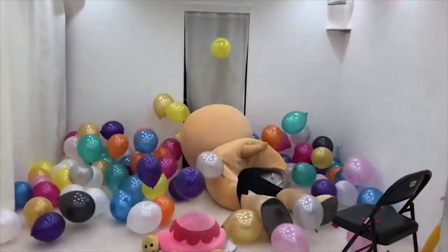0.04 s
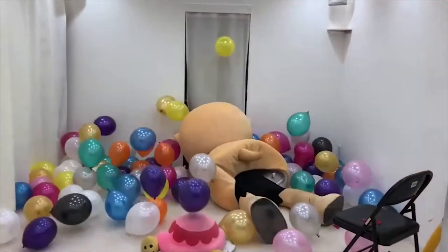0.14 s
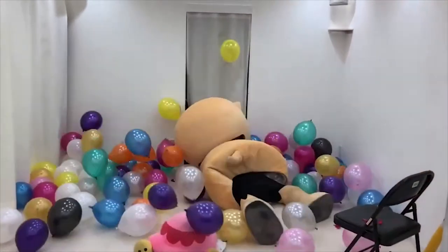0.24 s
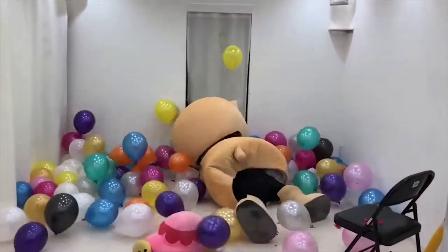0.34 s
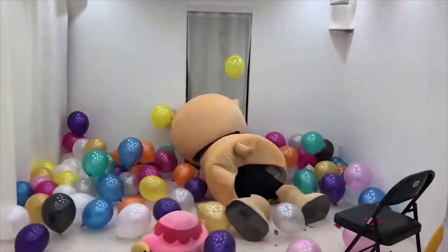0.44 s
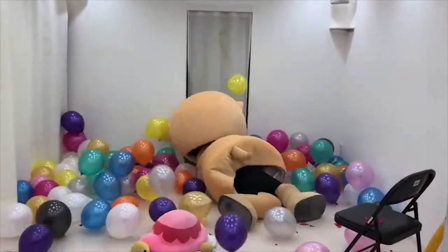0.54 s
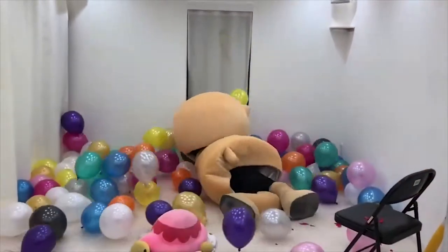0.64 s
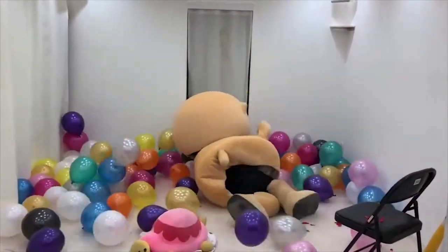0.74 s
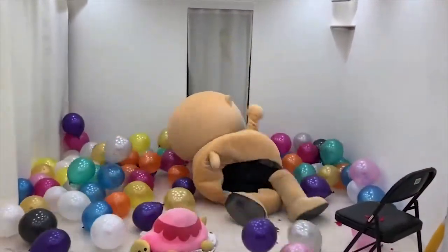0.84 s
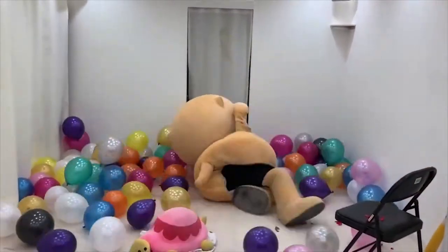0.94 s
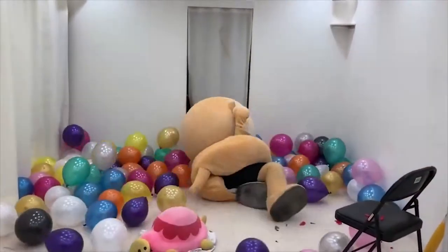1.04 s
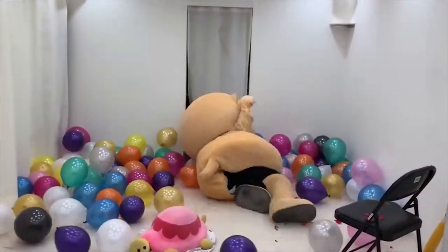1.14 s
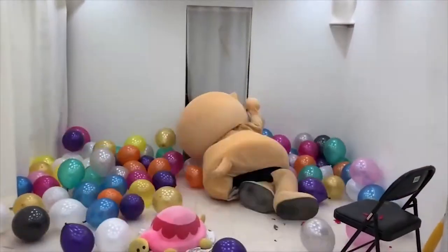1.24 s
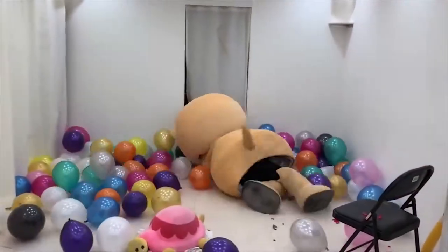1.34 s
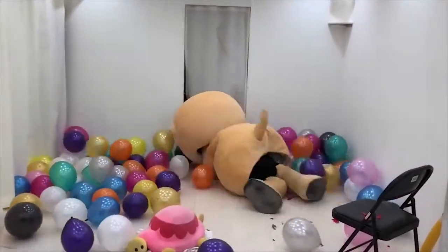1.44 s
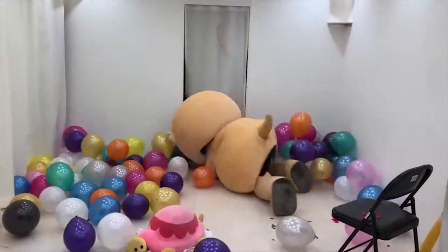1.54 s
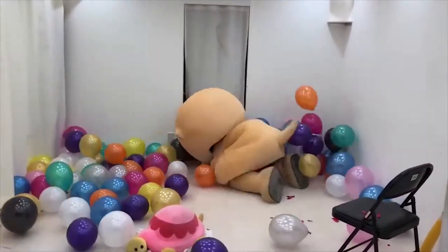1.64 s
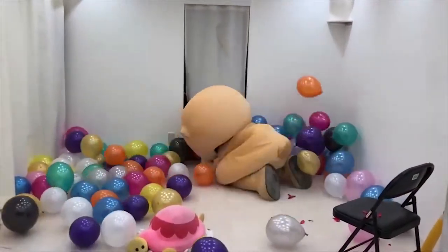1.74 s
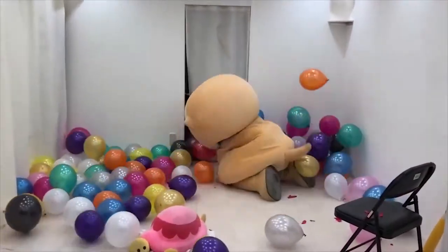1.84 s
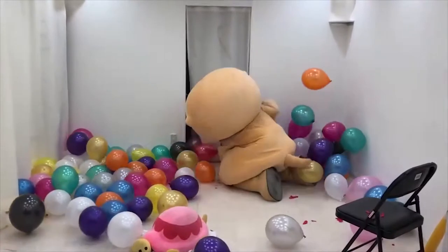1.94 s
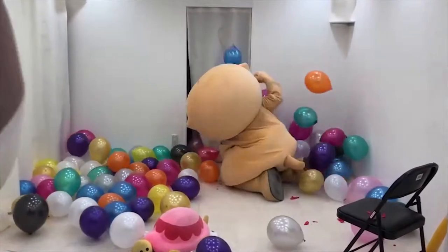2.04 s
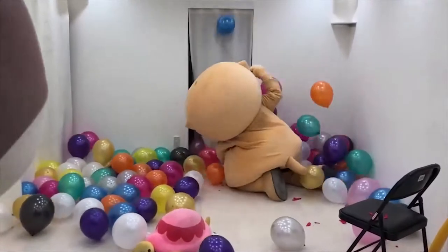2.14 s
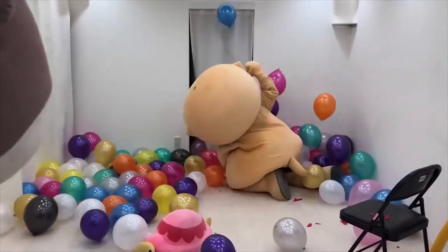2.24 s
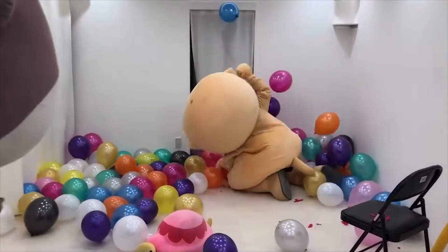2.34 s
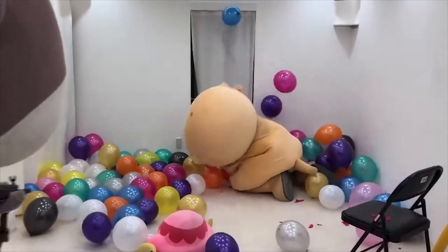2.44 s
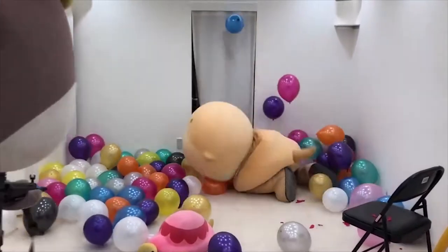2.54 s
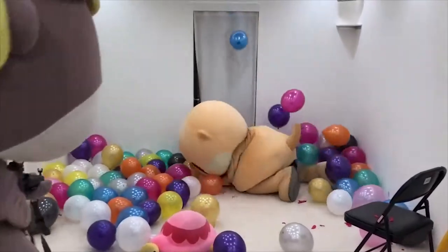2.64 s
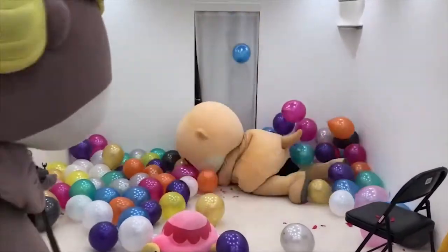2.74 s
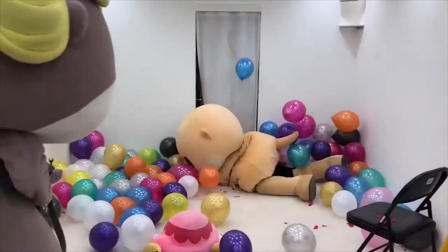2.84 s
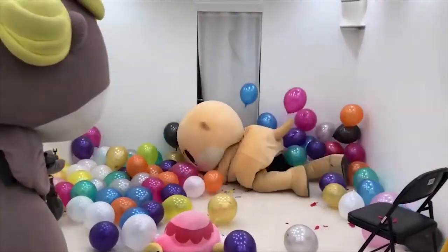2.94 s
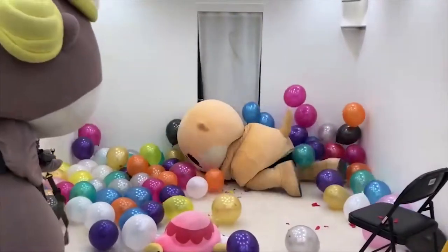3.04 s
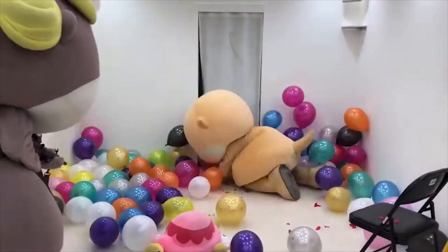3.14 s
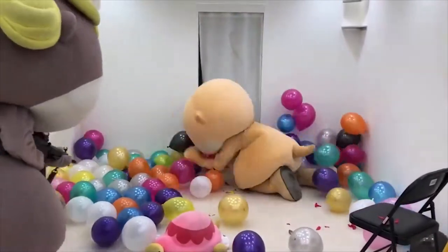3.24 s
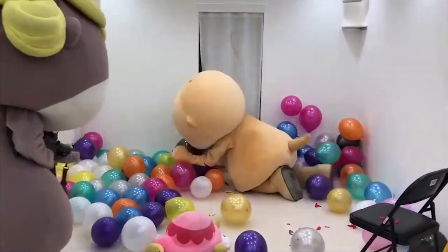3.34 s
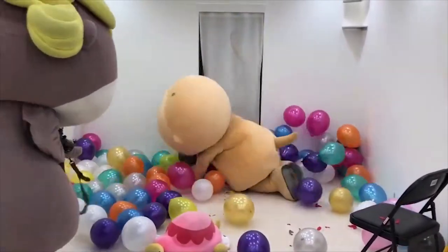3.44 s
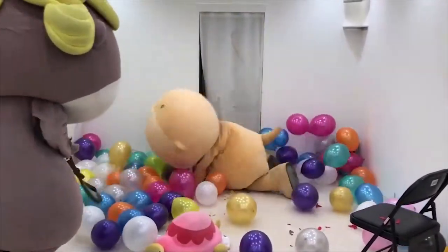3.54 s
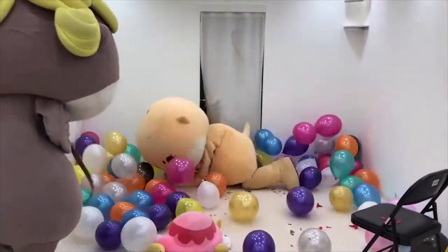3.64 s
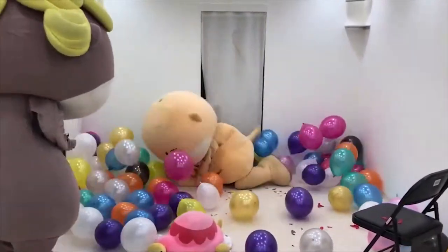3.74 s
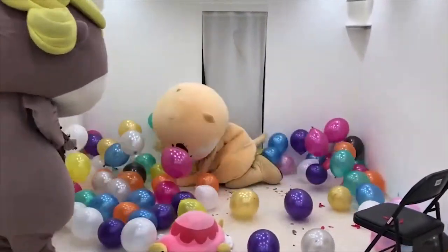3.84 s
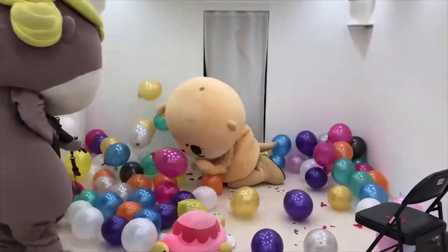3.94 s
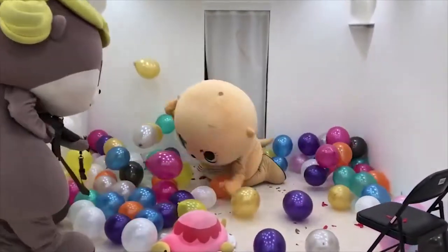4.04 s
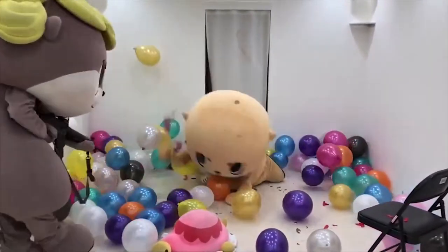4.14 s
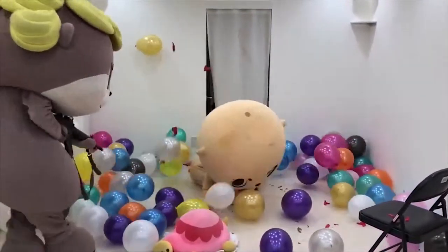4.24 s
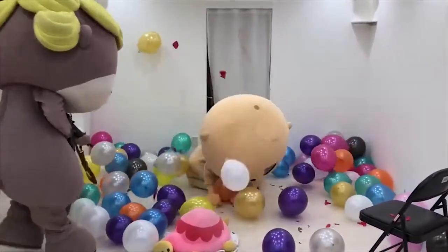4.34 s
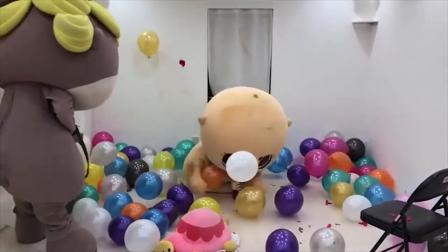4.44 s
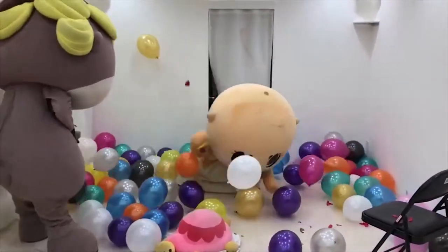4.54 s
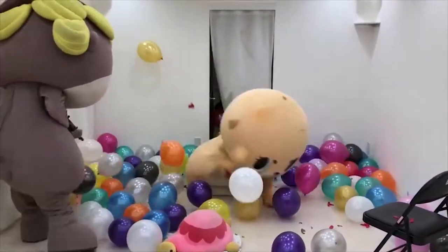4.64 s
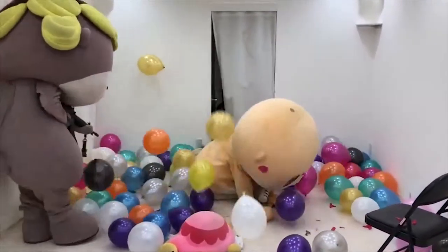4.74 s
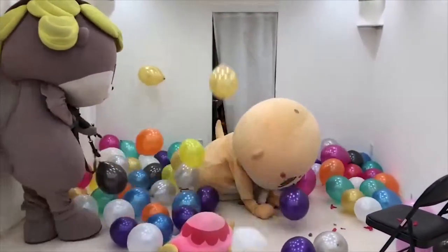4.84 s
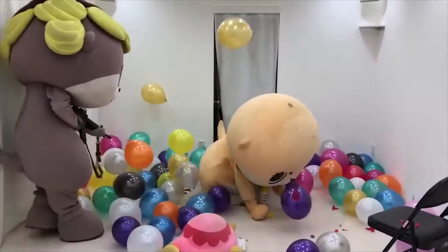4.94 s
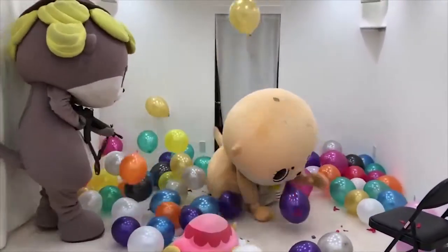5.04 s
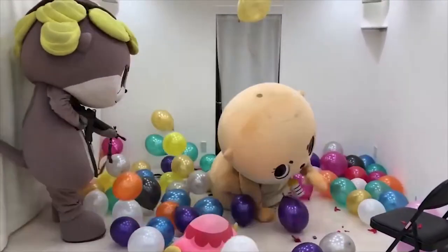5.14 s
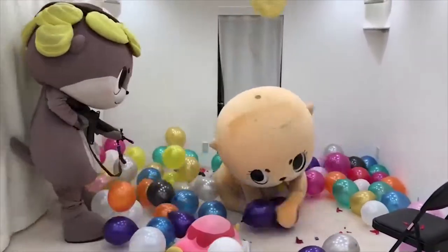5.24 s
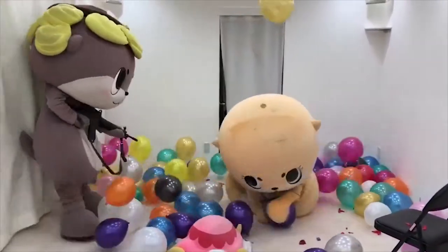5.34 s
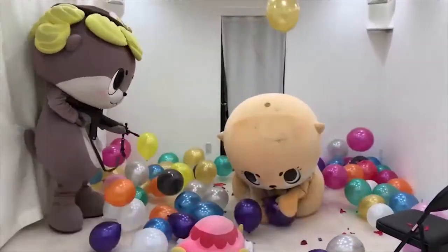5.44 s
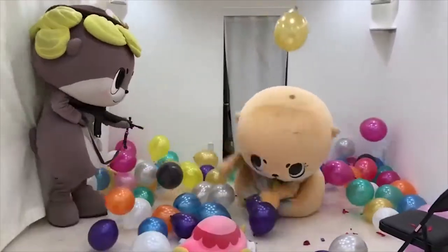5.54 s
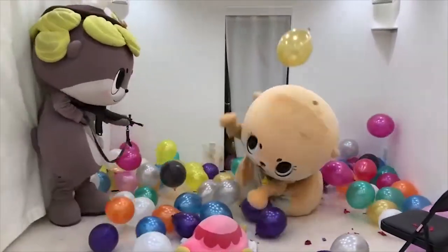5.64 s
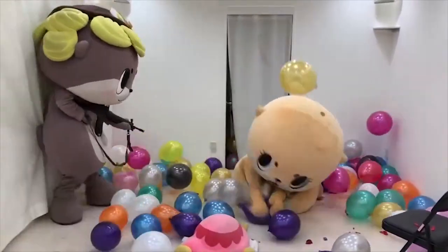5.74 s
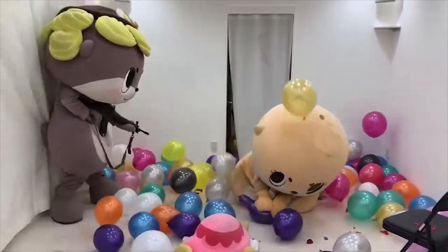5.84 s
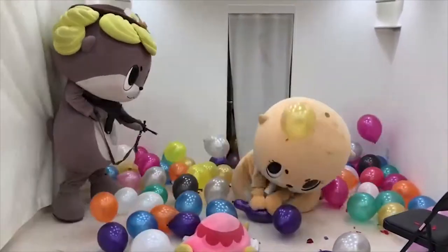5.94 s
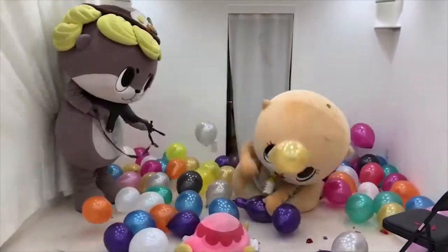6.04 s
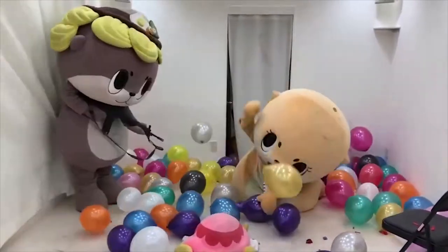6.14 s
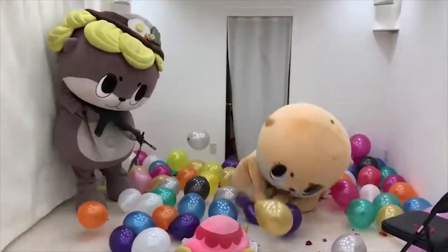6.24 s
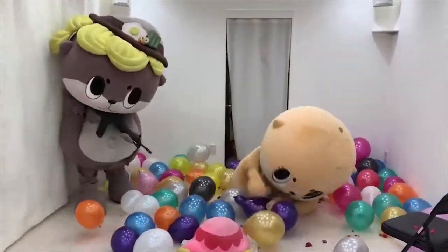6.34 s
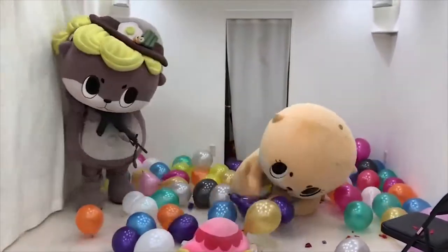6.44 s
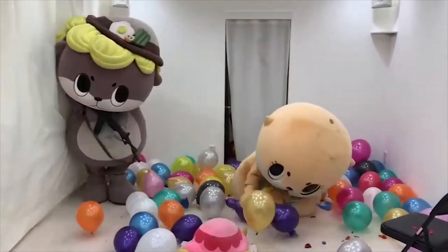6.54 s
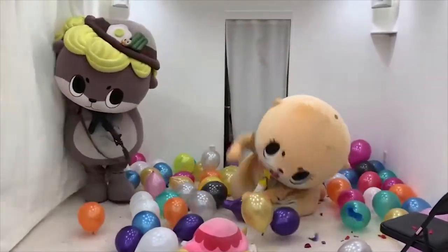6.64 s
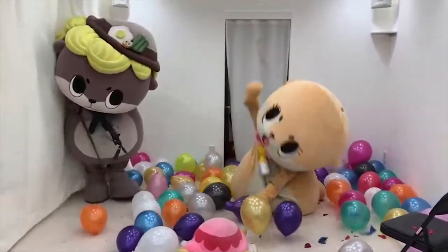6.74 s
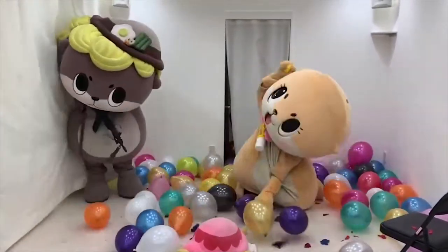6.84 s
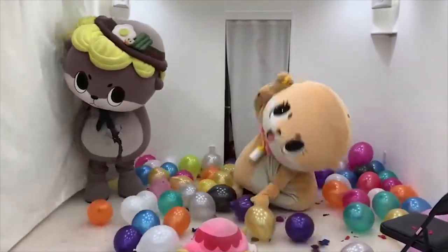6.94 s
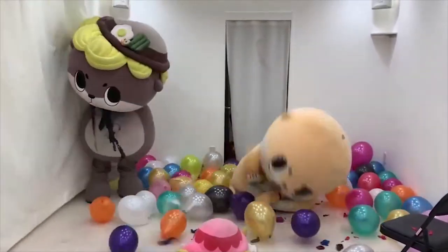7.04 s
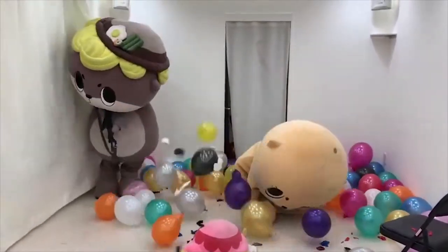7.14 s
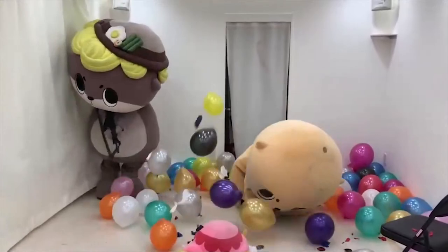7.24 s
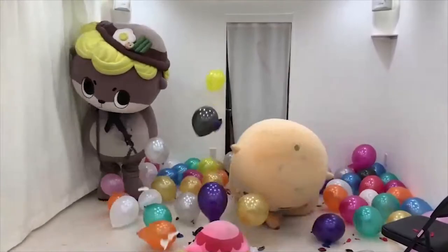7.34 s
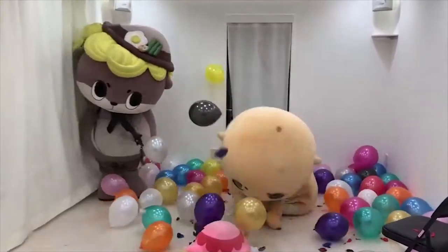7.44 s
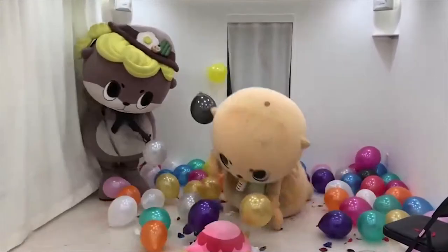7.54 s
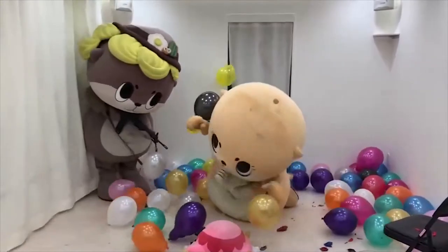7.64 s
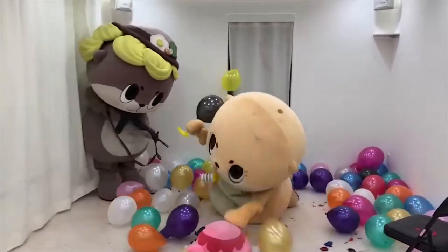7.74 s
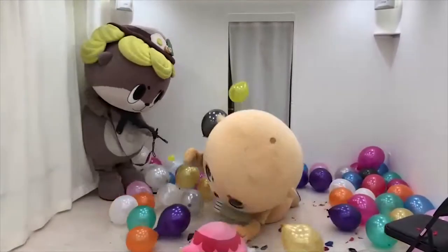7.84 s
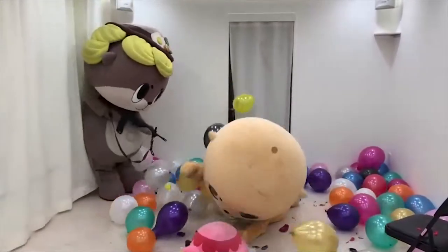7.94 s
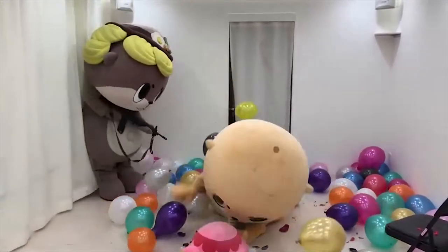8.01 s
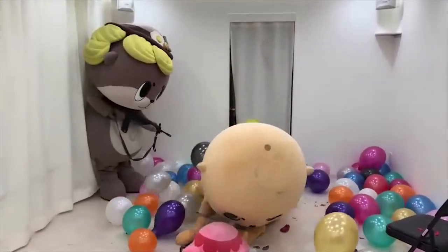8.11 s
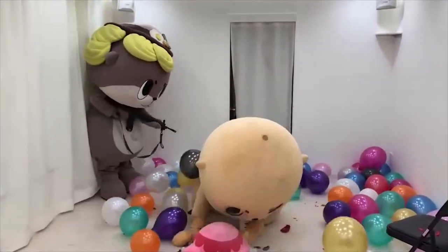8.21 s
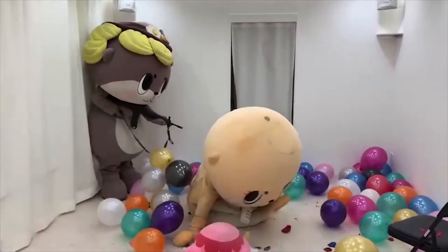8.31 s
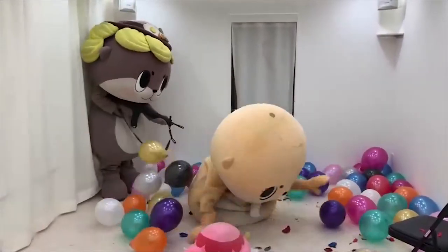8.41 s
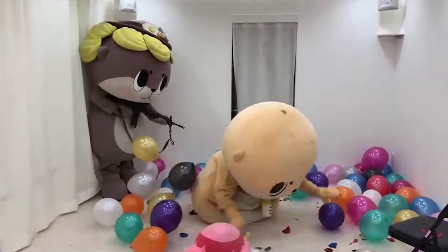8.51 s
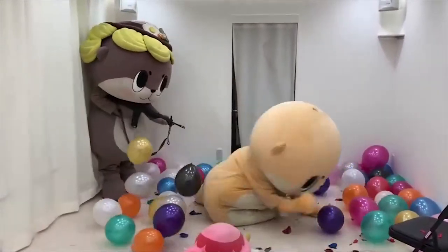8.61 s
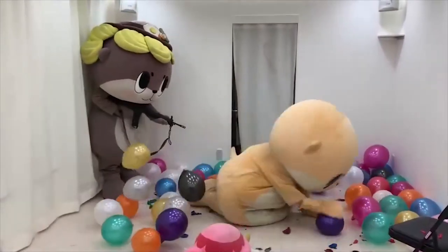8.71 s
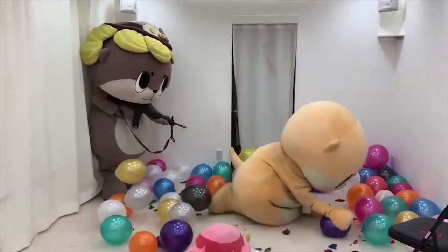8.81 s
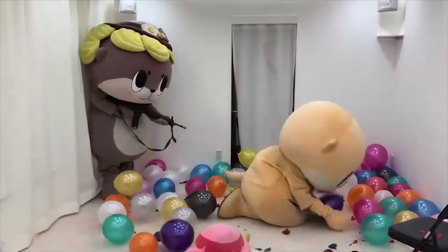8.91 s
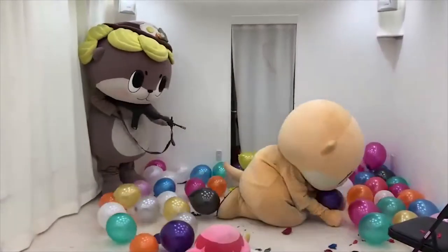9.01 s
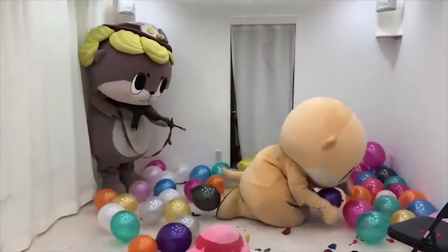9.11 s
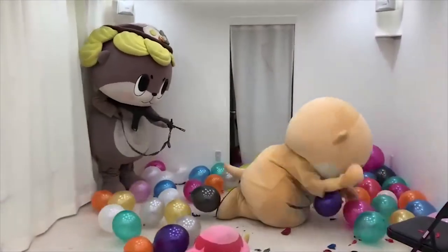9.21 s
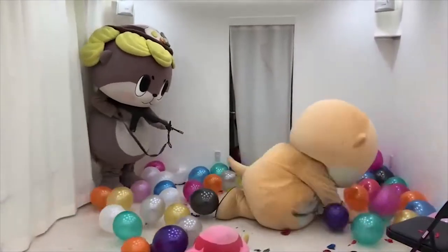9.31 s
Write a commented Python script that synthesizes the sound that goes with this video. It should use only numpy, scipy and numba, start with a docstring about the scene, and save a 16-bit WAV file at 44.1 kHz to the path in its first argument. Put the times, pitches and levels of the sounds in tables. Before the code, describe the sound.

A small bare room, heard through a phone microphone that flattens loud peaks. For the first 1.3 s there is only very faint cloth rustle and balloons bumping hollowly. At 1.4 s a soft low thud comes with a muffled burst; the stirring swells, and tiny rubber squeaks chirp until about 3 s, with a tight triple pop near 2.6 s. At 3.5 s bright ripping snaps lead into a hard cluster of bangs, with a heavy padded thump at 3.65 s. Further bursts come at 4.1-4.2, 4.7-4.9, 5.1-5.4 and 5.7-5.8 s. A rapid volley cracks at 6.3-6.6 s, then spaced bangs at 6.9, 7.1, 7.65 and 8.1 s, the one at 7.1 s big and slow-tearing, with body thuds. A pair bursts at 8.4-8.5 s, then a dense run from 8.8 to 9.1 s. Short boxy echoes and faint steel chair ringing follow; rustling and a soft thud close.

```python
"""Bursting a heap of balloons

Someone in a plush costume rolls about in a heap of party balloons in a small bare room and bursts them
in quick runs. Taut rubber squeaks as a stick-slip sawtooth, snaps as ringing noise and cracks in N-shaped pulses.
Each blast is noise that dies away band by band, and it sets a steel chair faintly ringing.
Cloth rustles as shaped noise and the body thuds in a few low cycles with a short boom.
The phone's limiter flattens every loud bang."""
import sys
import numpy as np
from scipy import signal
from scipy.fft import rfft, irfft, next_fast_len
from scipy.io import wavfile
from scipy.ndimage import uniform_filter1d
from numba import njit

SR = 44100
rng = np.random.default_rng(int(sys.argv[2]) if len(sys.argv) > 2 else 0)


def store_wav(level_fs):
    """Save 16-bit WAV to argv[1]."""
    pcm = np.round(np.clip(np.atleast_2d(level_fs), -1, 1) * 32767)
    wavfile.write(sys.argv[1], SR, pcm.T.astype(np.int16))


N = 413216

# how hard the body stirs the heap, driving both jostling and cloth: (time [s], effort level [dB])
MOVEMENT = [(0, -63.5), (.7, -59), (1.33, -49), (1.55, -37), (1.88, -43.5), (2.5, -44), (2.85, -46),
            (3.1, -53), (3.9, -50), (5.4, -50), (6.2, -49), (6.8, -51), (7.45, -57), (7.9, -53),
            (9.35, -51)]
# single strokes of plush over the rubber: (time [s], length [s], level [dB])
BRUSHES = [(0.341, 0.26, -58), (0.827, 0.08, -66), (0.963, 0.15, -60), (1.48, 0.15, -46.5),
           (2.758, 0.17, -51), (3.328, 0.11, -60), (4.298, 0.11, -48.5), (5.64, 0.089, -52.5),
           (5.937, .14, -56.5), (7.483, 0.14, -55), (7.854, 0.057, -56), (8.351, 0.11, -51)]
# tone of balloons bumping together: (frequency [Hz], relative level [dB])
JOSTLE_SPECTRUM = [(18, -42), (30, -23), (118, -3), (156, 0.5), (414, -13), (555, -14), (767, -18),
                   (895, -25.5), (1200, -32), (1560, -46), (2640, -120)]
# tone of the rustling plush: (frequency [Hz], relative level [dB])
CLOTH_SPECTRUM = [(400, -2.5), (900, 6.5), (2000, 3), (4500, 0.5), (8000, -7), (15000, -17.5)]
# body and limbs landing on the floor: (time [s], relative level [dB], pitch [Hz])
THUDS = [(.066, -44, 126), (.125, -47, 159), (1.429, -17, 120), (1.785, -36, 129), (2.209, -41, 200),
         (2.284, -30, 147), (3.365, -43, 187), (3.652, -10.5, 135.6), (3.721, -41, 128), (4.534, -40, 158),
         (4.767, -26, 130), (4.885, -28.5, 121), (5.866, -23, 146), (6.12, -40.5, 139), (7.135, -22, 135),
         (7.192, -21, 131), (7.831, -37.5, 150), (9.356, -28.5, 184)]
# light taps and scuffs on balloons: (time [s], level [dB], centre [Hz], t60 [s])
TAPS = [(.125, -55, 1470, 0.38), (1.309, -48, 4000, 0.16), (2.432, -39.5, 2490, 0.24),
        (2.572, -41.5, 2820, 0.17), (2.843, -51, 6000, .12), (2.96, -51, 2500, 0.11),
        (3.256, -42, 5030, 0.25), (3.315, -49, 4490, .17), (5.524, -35, 13000, 0.21),
        (5.585, -34, 7000, 0.034), (6.12, -40.5, 4300, 0.13), (6.845, -42.5, 2800, 0.11),
        (7.483, -46.5, 2380, 0.043), (8.063, -48, 2830, 0.76), (9.355, -43.5, 2000, .3)]
# ringing modes of the steel chair: (frequency [Hz], relative level [dB], t60 [s])
CHAIR_MODES = [(998, -59, .4), (1384, -57.5, .45), (1624, -53, .55), (1690, -56.5, .45), (1750, -55, .43),
               (1845, -52, .4), (2050, -55, .45), (2380, -56.5, .45), (2560, -55, .5), (2837, -58.5, .6),
               (3070, -55, .55), (3240, -58.5, .8), (3403, -58, .5)]
# rubber rubbing on rubber:
# (time [s], length [s], slip rate at start [Hz], slip rate at end [Hz], relative level [dB], roughness [relative])
SQUEAKS = [(1.626, .03, 864, 914, -45, .01), (1.931, .026, 1318, 1383, -36.5, 0.13),
           (1.964, 0.06, 405, 465.5, -31.5, 0.04), (2.072, 0.067, 409, 484, -35.5, 0.04),
           (2.023, 0.013, 2500, 2600, -46, .02), (2.217, 0.037, 339, 381, -45, 0.24),
           (2.277, 0.019, 3490, 3700, -40.5, 0.03), (2.418, 0.054, 1150, 1383, -38, 0.03),
           (2.904, 0.036, 1145, 1166, -44.5, 0.04), (2.958, 0.029, 1475, 1420, -49.5, 0.32),
           (4.98, 0.0073, 4430, 3260, -34, 0.08), (7.257, 0.026, 3046, 3210, -39.5, .09),
           (8.957, 0.02, 626, 537, -28, 0.06)]
# bright snaps of taut rubber, most of them just ahead of a burst: (time [s], relative level [dB], pitch [Hz])
SNAPS = [(3.45, -9, 9270), (3.512, -14.5, 7950), (4.07, -22, 7900), (4.133, -17, 8050), (4.732, -24, 7800),
         (4.794, -16, 8100), (4.854, -20, 7800), (5.06, -23.5, 8150), (5.125, -22, 8000),
         (5.146, -23, 7300), (5.178, -18.5, 7900), (5.241, -18, 7600), (5.295, -19.5, 7800),
         (5.351, -21, 7840), (5.706, -16.5, 7820), (5.77, -15.5, 7400), (5.825, -18.5, 7760),
         (6.383, -11, 7980), (6.440, -9.5, 8000), (6.493, -8.5, 7960), (6.547, -12, 8300),
         (6.886, -18, 7400), (7.109, -17.5, 7650), (7.181, -17, 7500), (7.653, -20.5, 8250),
         (7.717, -21, 7870), (8.116, -18.5, 7660), (8.76, -26, 8000), (8.94, -19, 7900), (8.998, -22, 7860)]
# resonances of the snapping skin: (share of the pitch [ratio], nominal width [Hz], relative level [dB])
SKIN_MODES = [(0.706, 190, -22), (0.832, 190, -23.5), (.905, 225, -21.5), (.99, 250, -23.5),
              (1.026, 222, -14.5)]
# boxy resonances of the room: (frequency [Hz], width [Hz], lift [dB])
BOX_MODES = [(161.6, 24, 2), (280, 50, 2), (395, 66, 2.5), (494, 58, 0.5), (653, 300, 1), (2010, 620, -1)]
# room decay: (frequency [Hz], t60 [s])
ROOM_DECAY = [(60, 0.18), (200, 0.24), (560, 0.2), (1000, 0.22), (1900, 0.24), (4000, 0.2), (8000, 0.18),
              (15000, 0.13)]
# tone of a blast: (frequency [Hz], relative level [dB])
BLAST_SPECTRUM = [(18, -40), (30, -71.5), (53, -16), (129, -1.5), (281, 2), (859, -10), (928, -12.5),
                  (1030, -12), (1200, -13.5), (1600, -14.5), (1830, -13), (2920, -16.5), (8040, -19.5),
                  (13900, -27.5), (15000, -31.5)]
# bursting balloons; the faster the tear, the harder the crack:
# (time [s], relative level [dB], bass [dB], middle [dB], treble [dB], tearing time [s])
POPS = [(1.416, -24, 11.5, 2.5, -4, 0.016), (2.599, -26.5, 4, 2, -13, .021),
        (2.6172, -22.5, 7.5, 0.5, -7.5, .001), (2.664, -25, 6.5, 0.5, -17, .014),
        (3.456, -35, 2, -1.5, 15.5, .01), (3.531, -14, -11, 0, -7.5, .0045),
        (3.579, -19, -6.5, 1, -2, .003), (3.602, -18, -3.5, -1, -7, .0035), (4.077, -14, 2, -1, -6, .011),
        (4.147, -16.5, 1, -1, -1.5, .01), (4.1978, -13, -8.5, 0, -6, .0024),
        (4.74, -11.5, -3, -0.5, -4.5, .03), (4.8053, -18, -6, 1.5, 1, 0.0015),
        (4.866, -18, -4, 0.5, -0.5, 0.0021), (5.069, -16, -2, 4, -2.5, .024),
        (5.191, -17, -2.5, 1.5, -1.5, .0033), (5.214, -29, -10, -2, 2, .003),
        (5.305, -32.5, -32, -1, 15, .0062), (5.356, -18.5, -3, 2.5, 0, .0075), (5.715, -14, 0, 1, -6, .025),
        (5.836, -27.5, -13, 1, 0, .013), (6.332, -36, 12, -0.5, -3.5, .0064),
        (6.395, -20.5, -3, -0.5, -6, .004), (6.452, -21, -14, 0, -5.5, .0035),
        (6.503, -13.5, -3, -2, -1.5, .002), (6.528, -19, -1, -1, -4, .005),
        (6.5616, -15.5, 1.5, 2, -1, .0016), (6.895, -20, 5, -1, 0, .012), (7.115, -8.5, 1, 0.5, -5.5, .06),
        (7.178, -24, 2, 1, -0.5, .0066), (7.656, -15.5, -6.5, -1, -5.5, .011),
        (8.121, -14, 1.5, 1, -4.5, .032), (8.421, -9, -6.5, 0, -4, .042),
        (8.4894, -13, -3, 0.5, -5, 0.0034), (8.767, -16.5, -4.5, 0.5, 1.5, .013),
        (8.84, -18, -3, -0.5, -0.5, 0.0021), (8.900, -25.5, -33, 0, -1, .0045),
        (8.956, -22, -8, -3, -13, .005), (9.011, -16, 1, -0.5, -0.5, .0081),
        (9.07, -13.5, -5, 0.5, -6, 0.0026)]

TOP_HZ = 15100  # upper limit of the phone's sound
TIME = np.arange(N) / SR
AGE = TIME[:int(.7 * SR)]  # seconds since the start of one event


def undb(db):
    """Decibels to gain."""
    return 10 ** (np.asarray(db) / 20)


def unit(x):
    """Scale to rms 1."""
    return x / np.sqrt(np.mean(x ** 2))


def add(out, s, sound):
    """Mix a sound in at time s."""
    i = max(int(s * SR), 0)
    out[i:i + len(sound)] += sound[:max(N - i, 0)]


def along(points, hz):
    """Read (Hz, value) points on a log-frequency axis."""
    f, value = np.transpose(points)
    return np.interp(np.log(hz + 1), np.log(f), value)


def colour(x, gain):
    """Filter by a gain that is a function of frequency."""
    n = next_fast_len(len(x))
    hz = np.arange(n // 2 + 1) * SR / n
    return irfft(rfft(x, n) * gain(hz), n)[:len(x)]


def noise(n, gain):
    """Coloured noise of rms 1."""
    return unit(colour(rng.standard_normal(n), gain))


def fade_in(rise_s):
    """Straight rise to full level."""
    return np.minimum(AGE / rise_s, 1)


def fade(t60):
    """Exponential decay by 60 dB in t60 seconds."""
    return np.exp(-np.log(1000) * AGE / t60)


def held_fade(t60, hold_s):
    """Full level for hold_s seconds, then exponential decay."""
    return np.minimum(fade(t60) * 1000 ** (hold_s / t60), 1)


def walk(rate_hz):
    """Random levels of rms 1, stepped at rate_hz and smoothed by two moving averages."""
    step = int(SR / rate_hz)
    levels = np.repeat(rng.standard_normal(N // step + 1), step)
    smooth = uniform_filter1d(uniform_filter1d(levels, step), step)
    return unit(smooth[:N])


def in_room(x, wet_db, t60):
    """Direct sound plus dense wall reflections, made as decaying noise."""
    tail = rng.standard_normal(len(AGE)) * fade(t60)
    return x + undb(wet_db) * signal.oaconvolve(x, tail / np.linalg.norm(tail))[:N]


def stirring(jostle_db=-1, cloth_db=-19.0, cloth_growth=0.83):
    """Balloons bump hollowly against each other while plush brushes over them; each stroke swells and fades."""
    effort_db = np.interp(TIME, *np.transpose(MOVEMENT))
    rubbing = undb(cloth_db + cloth_growth * effort_db)  # the rustle grows more slowly than the bumping
    strokes = np.zeros(N)
    for s, length_s, db in BRUSHES:
        add(strokes, s, undb(db) * np.hanning(int(length_s * SR)))
    jostle = noise(N, lambda f: undb(along(JOSTLE_SPECTRUM, f)) / np.hypot(1, f / 1200))
    jostle = jostle * undb(2.1 * walk(30))
    cloth = noise(N, lambda f: undb(along(CLOTH_SPECTRUM, f)) * f / (f + 300))
    cloth = cloth * undb(2.75 * walk(25) + 1.15 * walk(570))  # slow and fine flicker
    return jostle * undb(effort_db + jostle_db) + cloth * np.hypot(rubbing, strokes)


def thuds(push_s=0.0075, boom_db=-13, boom_t60=0.25):
    """A padded blow gives a few low cycles, then the room booms."""
    out = np.zeros(N)
    for s, db, hz in THUDS:
        push = (AGE / push_s) ** 2 * np.exp(2 - 2 * AGE / push_s)  # peaks at push_s
        blow = np.sin(2 * np.pi * hz * AGE) * push
        boom = noise(len(AGE), lambda f: (f * hz / (f ** 2 + hz ** 2)) ** 3)
        boom = boom * fade(boom_t60) * fade_in(push_s)
        add(out, s, undb(db) * (1.24 * blow + 2.6 * undb(boom_db) * boom))
    return out


def taps():
    """Light contact on the rubber gives short scuffs of broad noise around a centre."""
    out = np.zeros(N)
    for s, db, hz, t60 in TAPS:
        scuff = noise(len(AGE), lambda f: f * hz / (f ** 2 + hz ** 2) / np.hypot(1, f / (2 * hz)))
        add(out, s, undb(db) * scuff * fade(t60) * fade_in(0.0052))
    return out


def chair(bangs, ring_db=-23):
    """The bangs set the chair's steel tubes ringing faintly in sympathy, as decaying sines."""
    ring = sum(undb(db) * np.sin(2 * np.pi * hz * AGE) * fade(t60) for hz, db, t60 in CHAIR_MODES)
    return undb(ring_db) * signal.oaconvolve(bangs, ring)[:N]


def squeaks(body_hz=1500, body_width_hz=700, body_db=-6, rasp_db=-9, gain_db=-1):
    """Stick and slip: an uneven sawtooth with a rasp at each slip, coloured by the balloon's hollow body."""
    def body(f):
        """One broad resonance with a soft top."""
        peak = undb(body_db) / (1 + (2 * (f - body_hz) / body_width_hz) ** 2)
        return (1 + peak) / (1 + (f / 7000) ** 2)

    out = np.zeros(N)
    for s, length_s, start_hz, end_hz, db, rough in SQUEAKS:
        n = int(length_s * SR)
        jitter = unit(uniform_filter1d(rng.standard_normal(n), size=40))
        slip_hz = np.linspace(start_hz, end_hz, n) * (1 + 2 * rough * jitter)
        phase = 2 * np.pi * np.cumsum(slip_hz) / SR
        harmonics = range(1, int(TOP_HZ / end_hz) + 1)
        slips = sum(np.sin(k * phase) / k ** 1.15 for k in harmonics)
        slips = slips * (1 + 0.099 * np.sin(phase / 2))  # strong and weak slips alternate
        grit = noise(n, lambda f: f / (f + start_hz) / (1 + (f / 4500) ** 2))
        rasp = undb(rasp_db) * (1 + np.cos(phase)) * grit
        rubbed = unit(colour(slips + rasp, body))
        add(out, s, undb(db + gain_db) * rubbed * signal.windows.tukey(n, .4))
    return in_room(out, wet_db=-5, t60=.2)


def snaps(rise_s=0.0089, hold_s=0.003, ring_t60=.05, tail_db=-11, tail_t60=0.2, hiss_db=-24, gain_db=-4):
    """A brief rip of taut rubber rings its high resonances; a hissier tail lingers in the room."""
    def hiss(f):
        """Broad tearing noise."""
        return undb(hiss_db) * f / (f + 1500) / np.hypot(1, (f / 10500) ** 3)

    out = np.zeros(N)
    onset = fade_in(rise_s)
    ring = onset * held_fade(ring_t60, hold_s)
    for s, db, pitch in SNAPS:
        def skin(f):
            """Narrow peaks of the stretched skin."""
            return sum(undb(g) / np.hypot(1, 2 * (f - share * pitch) / width) ** 1.3
                       for share, width, g in SKIN_MODES)

        rip = ring * noise(len(AGE), lambda f: skin(f) + hiss(f) / 2)
        tail = onset * fade(tail_t60) * noise(len(AGE), lambda f: skin(f) + 2 * hiss(f))
        add(out, s, undb(db + gain_db) * (rip + undb(tail_db) * tail))
    return out * undb(0.56 * walk(700))  # fine flicker


def cracks(length_s=.00032, volley_s=.0035, crack_gain_db=4, echo_db=-14, echo_t60=0.064,
           dull_hz=5500, sharp_s=0.0022):
    """The splitting skin fires a few milliseconds of N-shaped pulses, chased by echoes off the floor."""
    out = np.zeros(N)
    density = np.exp(-(AGE / volley_s) ** 2) + undb(echo_db) * fade(echo_t60)  # level of the pulses
    for s, db, _, _, _, tear_s in POPS:
        size = rng.uniform(0.56, 1.7)  # balloons differ in size
        wave = np.linspace(1, -1, max(int(length_s * size * SR), 4))
        signs = rng.choice([-1, 1], len(AGE))
        firing = rng.random(len(AGE)) < 5000 / SR  # 5000 pulses a second on average
        pulses = signs * firing * density
        sharpness = min(sharp_s / tear_s, 2) ** 2  # a slow tear makes hardly any shock front
        add(out, s, sharpness * undb(db + crack_gain_db) * np.convolve(pulses, wave))
    return signal.sosfilt(signal.butter(1, dull_hz, fs=SR, output="sos"), out)


def near_walls(x, reach_s=.02, count=14, share=.1, above_hz=1200):
    """The small room lifts its own resonances; a few early reflections comb the upper range."""
    def box(f):
        """Boxy peaks and dips."""
        return undb(sum(db / (1 + (2 * (f - hz) / width) ** 2) for hz, width, db in BOX_MODES))

    paths = np.zeros(int(reach_s * SR) + 1)
    delays = (rng.uniform(.05, 1, count) * reach_s * SR).astype(int)
    paths[delays] = share * rng.choice([-1, 1], count)
    echoes = colour(signal.oaconvolve(x, paths)[:N], lambda f: f ** 2 / (f ** 2 + above_hz ** 2))
    return unit(colour(x + echoes, box))


def blasts(drive_db=3, bass_hz=450, middle_hz=1500, treble_hz=3500, late_db=-36, late_t60=0.42, early_s=0.016):
    """Each burst swells while the skin tears, is held up by the near walls, then dies away band by band."""
    centres = 30 * 2 ** np.arange(0, 9.6, .75)  # band centres [Hz], three quarters of an octave apart
    hz = np.arange(N // 2 + 1) * SR / N
    field = rfft(near_walls(noise(N, lambda f: undb(along(BLAST_SPECTRUM, f)))))
    clumps = unit(undb(1.1 * walk(300) + 2.3 * walk(1400)))
    out = np.zeros(N)
    for centre, share in zip(centres, np.eye(len(centres))):
        # how far this band counts as bass, treble and middle
        low = 1 / (1 + (centre / bass_hz) ** 2)
        high = 1 / (1 + (treble_hz / centre) ** 2)
        middle = np.exp(-np.log(centre / middle_hz) ** 2)
        early = held_fade(along(ROOM_DECAY, centre), early_s)
        late = undb(late_db) * fade(late_t60)
        decay = early ** 2 + (1 - high) * late ** 2  # as power
        power = np.zeros(N)
        for s, db, bass_db, middle_db, treble_db, tear_s in POPS:
            swell = fade_in(tear_s + 0.0091 * low) ** 1.82  # the lows build up later
            band_db = db + drive_db + low * bass_db + middle * middle_db + high * treble_db
            add(power, s, undb(band_db) ** 2 * swell * decay)
        grain = low + (1 - low) * clumps  # separate reflections make the upper bands crackle
        crossfade = np.interp(np.log(hz + 1), np.log(centres), share)
        out += grain * np.sqrt(power) * irfft(field * crossfade, N)
    return out


def scene():
    """All sources at one microphone."""
    bangs = blasts() + cracks()
    return (bangs + chair(bangs) + snaps() + squeaks() + taps() + thuds() + stirring())[None]


@njit
def follow(x, attack, release):
    """Envelope that moves by a set share per sample, one for rising and one for sinking."""
    out, e = np.empty(len(x)), 0.
    for i in range(len(x)):
        e += (x[i] - e) * (attack if x[i] > e else release)
        out[i] = e
    return out


def record(dry, limit_db=-10.5, ceiling=.48, attack_s=.001, release_s=0.024):
    """The phone's limiter holds the bangs down, rounds the cracks that slip through and cuts the top."""
    envelope = follow(np.abs(dry[0]), 1 / (1 + attack_s * SR), 1 / (1 + release_s * SR))
    held = dry / (1 + (envelope / undb(limit_db)) ** 4) ** (1 / 4)
    rounded = ceiling * np.tanh(held / ceiling)
    return signal.sosfilt(signal.ellip(8, .2, 70, TOP_HZ, fs=SR, output="sos"), rounded)


dry = scene()
out = record(dry)
store_wav(out)
```